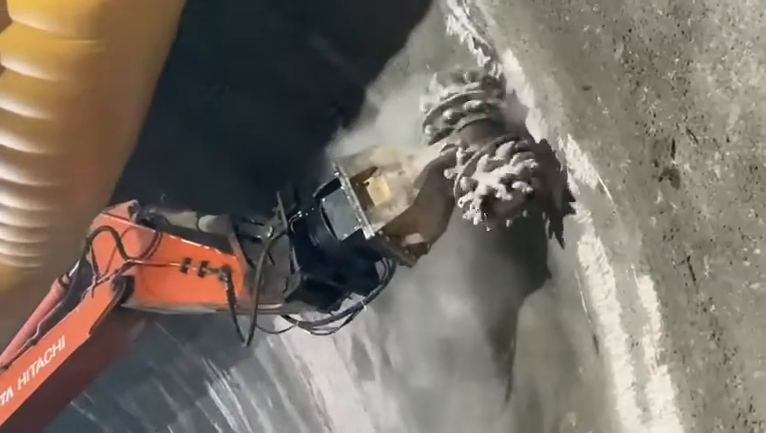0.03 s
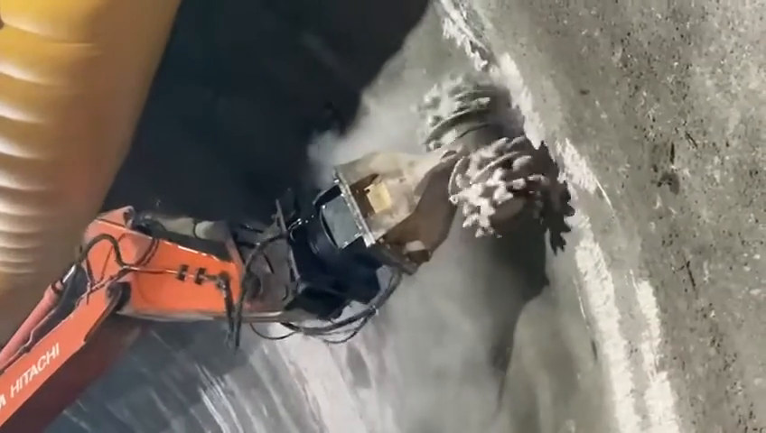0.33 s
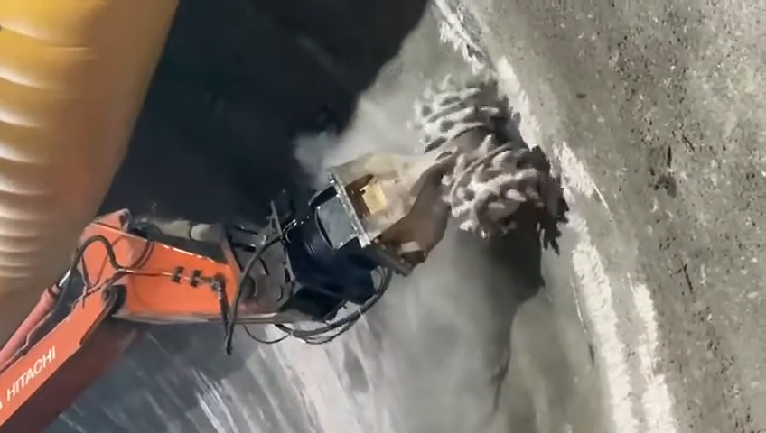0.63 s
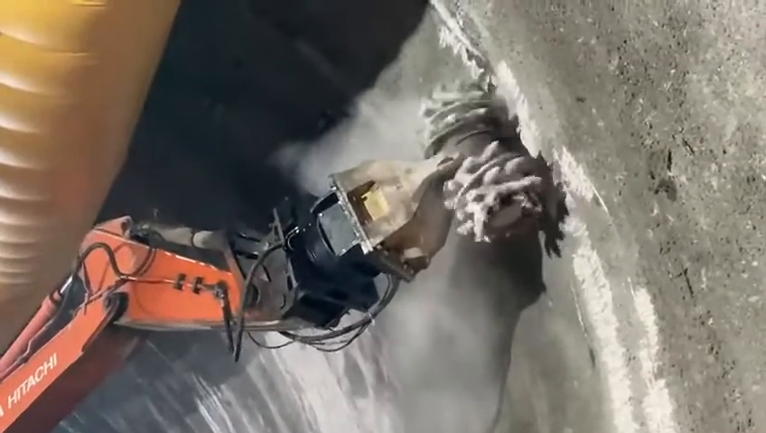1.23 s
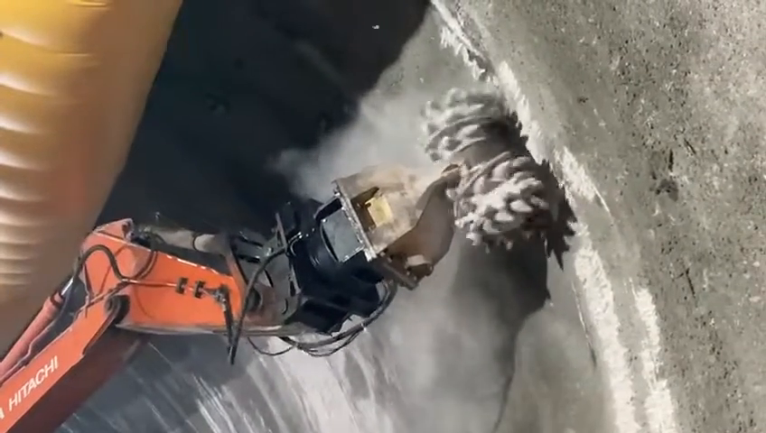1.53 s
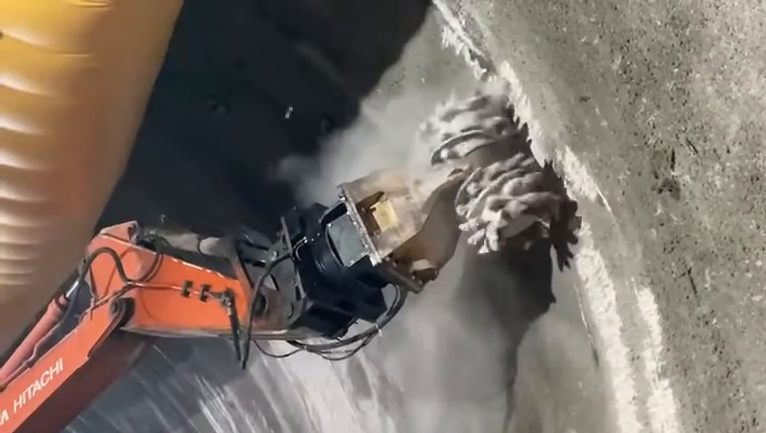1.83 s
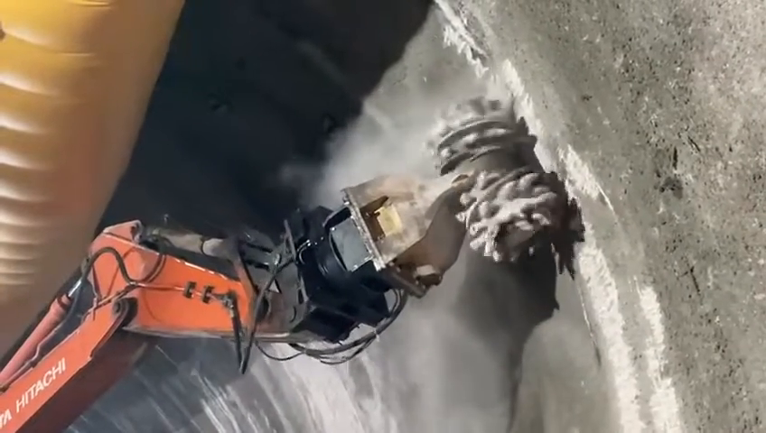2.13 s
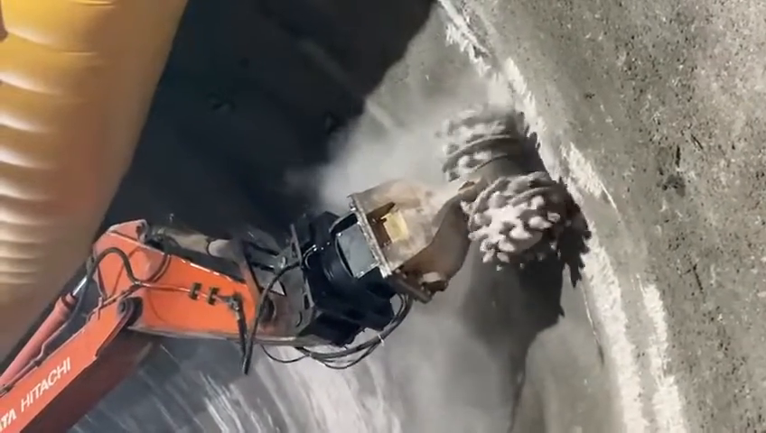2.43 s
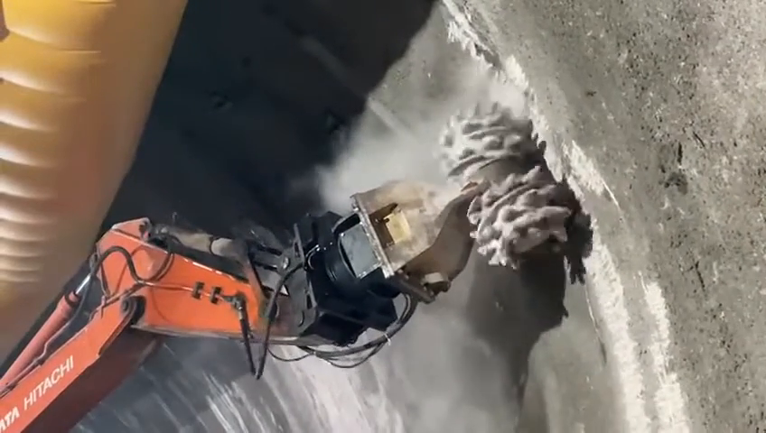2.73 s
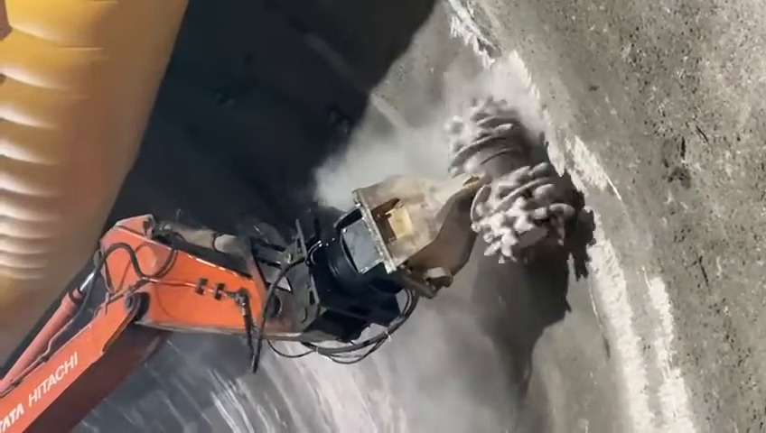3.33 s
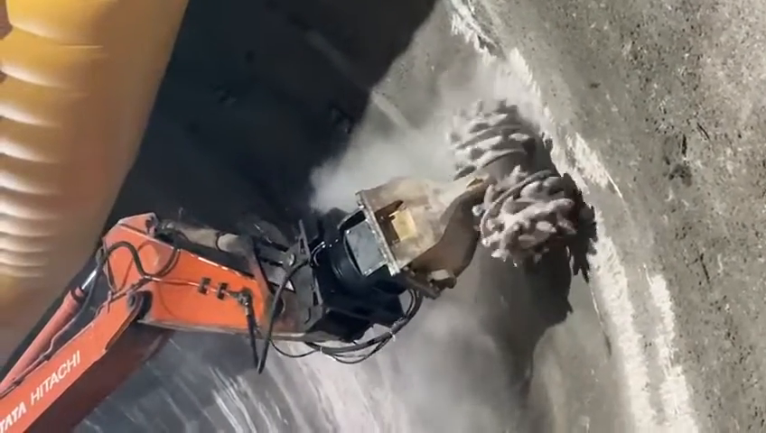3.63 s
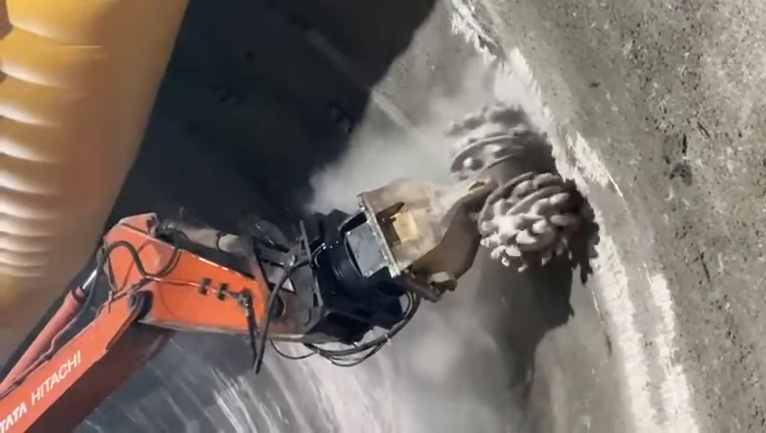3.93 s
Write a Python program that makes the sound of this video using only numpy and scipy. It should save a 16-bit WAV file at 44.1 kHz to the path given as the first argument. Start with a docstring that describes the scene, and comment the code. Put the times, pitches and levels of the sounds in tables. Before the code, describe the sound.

A rotating cutter crunches and scrapes through concrete while an excavator drones in a tunnel.

```python
"""A deep machine drone comes first, with roar and hydraulic whine: an excavator in a concrete tunnel.
Then the drum cutter on its arm meets the wall and crunches on, its picks biting in uneven scrapes
that ring the steel and spray chips. Gravel cracks, hard stones snap and sticking picks squeal.
A spaced pair of microphones stands in the tunnel, where the cutting arrives both direct and
blurred by the walls."""
import sys
import numpy as np
from scipy import signal
from scipy.fft import rfft, irfft
from scipy.io import wavfile

SR = 44100
rng = np.random.default_rng(int(sys.argv[2]) if len(sys.argv) > 2 else 0)


def log_audio(samples):
    """Write samples as a 16-bit WAV file to the path given in sys.argv[1]."""
    # one column per channel
    frames = np.atleast_2d(samples).T
    # limit to full scale, then quantise
    limited = np.clip(frames, -1, 1)
    pcm = np.round(limited * 32767).astype(np.int16)
    wavfile.write(sys.argv[1], SR, pcm)


N = 176400

# reverberation of the tunnel: frequency_hz, t60_s
TUNNEL_DECAY = [(100, 1), (1000, 0.37), (4000, 0.29), (11000, 0.52)]
TUNNEL_WET_DB, REFLECTIONS_PER_S = -1, 3000
# likeness of the two microphones: frequency_hz, correlation (-1 to 1)
MIC_LIKENESS = [(30, .94), (130, .96), (350, .73), (700, .62), (1200, .3), (1500, .02), (3400, .1),
                (4200, .45), (5100, -.2), (6100, 0), (6600, .85), (7250, 1), (7700, .6), (8500, -.9),
                (9100, -1), (9650, -.95), (10700, .95), (11500, 1)]
# balance of the pair: frequency_hz, left_minus_right_db
MIC_BALANCE = [(60, -1.2), (200, -0.16), (600, 1.7), (1500, 1.6), (2800, 0.28), (5700, -0.81), (8000, -1.8),
               (12000, -2.1)]
KNEE, CEILING, BAND_EDGE_HZ = .6, .88, 11900

# engine and fan roar: frequency_hz, relative_db
ROAR_SPECTRUM = [(20, -31), (40, -11), (58, -3.5), (110, -1), (170, 2), (260, -7), (400, -5), (850, -7),
                 (1300, -9), (2000, -17), (3000, -18.5), (4200, -26), (6800, -36), (11500, -43.5)]
ROAR_DB = -26
# hydraulic hum and whine: pitch_hz, width_hz, level_db
WHINE_TONES = [(64, 8, -41), (494, 14, -40), (880, 45, -41), (1442, 14, -41)]
# swell of the low hydraulic moan: time_s, level_db
MOAN_LEVEL = [(0, -30), (.5, -30.5), (1.1, -29.5), (1.45, -31.5), (1.75, -30), (2.05, -28.5), (2.3, -34),
              (2.9, -28), (3.3, -34), (4, -31.5)]
MOAN_HZ, MOAN_WIDTH_HZ = 264, 12
# note of the machine: time_s, pitch_hz
DRONE_NOTE = [(0, 83.5), (.4, 79), (.5, 78), (.6, 80), (1.6, 81), (1.93, 82), (2.2, 79.5), (2.95, 80),
              (3.35, 79.5), (3.85, 79.5), (4, 83)]
# strength of that note: time_s, level_db
DRONE_SWELL = [(0, -20), (.2, -21.5), (.36, -18.5), (.54, -24.5), (.62, -17), (.7, -18), (.8, -21.5),
               (1.2, -20.5), (2, -21), (2.6, -21), (3.05, -19), (3.55, -22), (4, -22)]
# its harmonics: multiple, relative_db
DRONE_HARMONICS = [(1, -2), (2, -21), (3, -19.5)]
DRONE_WAVER, DRONE_LEFT_DB = 0.023, -1.5

# gravel cracking between picks and wall: time_s, level_db
GRAVEL_LEVEL = [(0, -60), (.22, -58), (.25, -24), (.33, -39), (.5, -27), (.65, -32), (.79, -36), (.85, -23),
                (1.05, -39), (1.13, -42), (1.2, -31), (1.28, -36), (1.42, -22.5), (1.58, -35.5),
                (1.75, -25), (1.81, -58), (1.9, -30), (2.01, -33.5), (2.12, -26), (2.18, -22.5),
                (2.27, -29), (2.4, -25), (2.48, -30), (2.65, -35), (2.78, -29.5), (2.9, -28), (3.02, -51),
                (3.2, -28), (3.28, -45), (3.4, -36), (3.53, -45), (3.63, -30.5), (3.8, -42), (3.87, -24),
                (4, -39)]
GRAVEL_PER_S, GRAVEL_SPREAD_DB = 900, 2
GRAVEL_LOW_HZ, GRAVEL_HIGH_HZ, GRAVEL_RING_S = 1045, 3307, 0.0024
# stones snapping: start_s, level_db, decay_s
STONE_SNAPS = [(.377, -19, .001), (.693, -38, 0.0018), (.816, -28, .012), (0.8305, -15, 0.00094),
               (1.178, -27, .005), (1.29, -30, 0.0018), (1.728, -27, 0.017), (2.541, -27, .002),
               (2.706, -20.5, 0.0058), (3.056, -22, .005), (3.091, -19, .004), (3.099, -18, .003),
               (3.171, -17, 0.008)]
# colour of a snap: frequency_hz, relative_db
SNAP_SPECTRUM = [(30, -35), (200, -11), (1000, 0), (3000, 3.5), (5000, -1.5), (6300, -18), (6750, 8.5),
                 (7200, -6), (11500, -5.5)]
# modes of the drum and picks: pitch_hz, width_hz, relative_db
STEEL_MODES = [(918, 20, -19), (1436, 14, -18), (1770, 40, -12), (2025, 35, -18), (1893, 14, -14),
               (2245, 16, -21), (2350, 40, -17), (2555, 45, -20), (3100, 25, -18), (3453, 20, -16),
               (3709, 22, -22), (3942, 10, -20), (4076, 45, -25), (4530, 45, -19), (5700, 100, -10.5)]
CLINKS_PER_MODE_PER_S, CLINK_ROLLOFF_HZ = 10, 4400
CLINK_DB, CLINK_LOAD_SHARE = -26.5, 0.57
# sticking picks: middle_s, half_length_s, pitch_hz, level_db
PICK_SQUEALS = [(0.353, 0.022, 5710, -29), (.36, 0.028, 3960, -30), (0.728, 0.015, 1450, -29),
                (0.776, .01, 1450, -40), (0.85, 0.0064, 5700, -25), (0.894, 0.049, 3420, -30),
                (0.957, 0.014, 1892, -16), (0.965, 0.013, 2245, -30), (0.943, 0.024, 5690, -31.5),
                (1.032, 0.016, 3440, -30), (1.03, 0.012, 1893, -29), (1.091, .012, 1893, -32),
                (0.494, 0.061, 520, -23.5), (1.902, 0.019, 2280, -27.5), (2.08, 0.025, 913, -29),
                (2.56, .013, 893, -25), (2.685, 0.015, 890, -29), (3.095, .016, 1783, -32),
                (3.188, 0.011, 897, -23.5), (3.3, 0.014, 922, -28.5), (3.357, 0.0092, 917, -23),
                (3.404, 0.013, 907, -26), (3.448, .01, 1430, -27), (3.654, .01, 5700, -44),
                (3.815, 0.01, 5713, -40)]
SQUEAL_WOBBLE_HZ, SQUEAL_ROUGH_DB = 25.7, -0.5

# how hard the drum leans on the wall: time_s, level_db
DRUM_LOAD = [(0, -71), (.22, -42), (.32, -16.5), (.48, -17.5), (.6, -20.5), (.69, -22), (.78, -22.5),
             (.88, -21.5), (1.27, -31), (1.48, -20), (1.6, -27), (1.75, -22), (1.98, -26), (2.17, -22.5),
             (2.5, -26), (2.85, -24.5), (3.02, -30), (3.18, -29), (3.38, -30), (3.54, -33), (3.66, -27),
             (4, -28)]
# lumps of concrete breaking out: start_s, level_db
LUMP_BREAKS = [(.33, -24), (.44, -24), (.49, -34), (.68, -19), (1.4, -19), (1.725, -25), (2.06, -31),
               (2.16, -15.5), (2.38, -22.5)]
LUMP_RISE_S = 0.01
# crushed concrete: frequency_hz, relative_db
CRUNCH_SPECTRUM = [(25, -10), (60, -22), (115, 6), (250, 2.5), (320, 3), (400, -1), (520, 0.5), (680, -1.5),
                   (860, 1), (1050, -3.5), (1250, -4.5), (2000, -8.5), (3000, -13), (4200, -16.5),
                   (5100, -21), (7000, -24), (11500, -41)]
CRUNCH_PER_S, CRUNCH_SPREAD_DB = 3000, 3.5
PATCH_HZ, PATCH_S, PATCH_DB = 190, 0.027, 3.5  # width, length and depth of the fragments' colouring

# picks biting the wall: start_s, length_s, scrape_db, spray_db
PICK_BITES = [(0.228, 0.053, -25, -37), (0.296, 0.058, -21.5, -30), (0.403, 0.11, -27, -31),
              (0.7, 0.07, -50, -46), (0.81, 0.031, -19, -30.5), (0.866, 0.077, -31.5, -44),
              (0.922, 0.022, -22.5, -37), (1.01, 0.087, -28.5, -42), (1.154, 0.05, -25, -34.5),
              (1.254, 0.087, -31, -51), (1.392, 0.079, -30.5, -41.5), (1.612, 0.048, -27.5, -43),
              (1.723, 0.022, -24.5, -27.5), (1.818, 0.098, -28.5, -40.5), (1.932, 0.086, -28.5, -41),
              (2.034, 0.073, -25.5, -33.5), (2.13, 0.071, -26.5, -38), (2.254, 0.07, -27.5, -52),
              (2.36, 0.05, -26.5, -42), (2.513, 0.06, -28, -32), (2.69, 0.044, -28.5, -35.5),
              (2.736, 0.069, -27, -38), (2.84, 0.11, -33.5, -45), (3.045, 0.069, -30, -33),
              (3.167, 0.027, -27, -31), (3.25, 0.1, -32, -41), (3.334, 0.073, -31.5, -44),
              (3.619, 0.065, -33.5, -45), (3.697, 0.03, -28.5, -35.5), (3.77, 0.087, -32.5, -51),
              (3.841, 0.11, -30.5, -41.5), (3.963, 0.033, -28.5, -35.5)]
CHATTER_HZ, CHATTER_DB = 70, 1
RING_DRIFT_HZ, RING_DRIFT_DB = 2.6, 4  # each steel mode drifts in level
# steel dragging through stone: frequency_hz, relative_db
SCRAPE_SPECTRUM = [(200, -10), (700, 4), (1400, -8.5), (2000, 0.5), (2700, 1), (3400, -4), (4200, -7),
                   (5150, -12), (5750, -8), (6200, -11), (7000, -8.5), (7900, -22), (11500, -46)]
SCRAPE_PER_S, SCRAPE_SPREAD_DB, SCRAPE_ATTACK_S, SCRAPE_RELEASE_S = 3500, 3, 0.013, 0.037
# flying chips: frequency_hz, relative_db
SPRAY_SPECTRUM = [(1000, -34), (5000, -39), (6800, 6), (7900, 11), (9200, 7), (11500, 7.5), (12500, -47)]
SPRAY_PER_S, SPRAY_SPREAD_DB, SPRAY_ATTACK_S, SPRAY_RELEASE_S = 900, 1, 0.0038, 0.0062

TIME_S = np.arange(N) / SR
BIN_HZ = np.fft.rfftfreq(N, 1 / SR)


def gain_of(db):
    """Decibels to gain."""
    return 10 ** (np.asarray(db) / 20)


def unit_rms(x):
    """Scales to an rms of 1."""
    return x / np.sqrt(np.mean(x ** 2) + 1e-20)


def at_hz(points, hz):
    """Reads a table on a log-frequency axis."""
    frequency, value = np.transpose(points)
    return np.interp(np.log(hz + 1), np.log(frequency + 1), value)


def curve(points):
    """Reads a control curve at every sample."""
    return np.interp(TIME_S, *np.transpose(points))


def coloured(x, spectrum):
    """Gives white sound a spectrum and keeps its power."""
    return irfft(rfft(x) * unit_rms(gain_of(at_hz(spectrum, BIN_HZ))), N)


def wander(rate_hz, step=32):
    """Smooth random drift of rms 1, mostly slower than rate_hz."""
    t = TIME_S[::step]
    rolloff = 1 + (np.fft.rfftfreq(len(t), step / SR) / rate_hz) ** 4
    drift = irfft(rfft(rng.standard_normal(len(t))) / rolloff, len(t))
    return np.interp(TIME_S, t, unit_rms(drift))


def resonate(x, hz, width_hz):
    """One ringing mode; keeps the power of white sound."""
    radius = np.exp(-np.pi * width_hz / SR)
    pole = radius * np.exp(2j * np.pi * hz / SR)
    return signal.lfilter([np.sqrt(2 * (1 - radius ** 2))], [1, -pole], x).real


def fractures(per_s, spread_db):
    """Tiny clicks at random moments, a few much larger than the rest."""
    size = gain_of(spread_db * np.minimum(rng.exponential(1, N), 4))
    breaks = rng.random(N) < per_s / SR
    return unit_rms(size * breaks * rng.choice([-1., 1.], (2, N)))


def stroke(start, length, attack_s, release_s):
    """Attack, hold and release of one pick's cut."""
    age = TIME_S - start
    return np.clip(age / attack_s, 0, 1) * np.exp(-np.maximum(age - length, 0) / release_s)


def tunnel(direct):
    """Dense reflections from the concrete walls join the direct sound; the bass lingers longest."""
    reflections = rng.standard_normal((2, SR)) * (rng.random((2, SR)) < REFLECTIONS_PER_S / SR)
    hz, t, bands = signal.stft(reflections, SR, nperseg=256)
    t60_s = at_hz(TUNNEL_DECAY, hz)[:, None]
    tail = signal.istft(bands * gain_of(-60 * t / t60_s) / np.sqrt(t60_s), SR, nperseg=256)[1]
    tail /= np.linalg.norm(tail, axis=1, keepdims=True)
    wet = signal.fftconvolve(direct, tail, axes=1)[:, :N]
    return (direct + gain_of(TUNNEL_WET_DB) * wet) / np.hypot(1, gain_of(TUNNEL_WET_DB))


def spaced_pair(x):
    """Two microphones, set apart, hear the bass alike and the treble in or out of step."""
    first, second = rfft(x)
    likeness = np.clip(at_hz(MIC_LIKENESS, BIN_HZ), -.995, .995)
    lean = gain_of(at_hz(MIC_BALANCE, BIN_HZ) / 2)
    mid = first * np.sqrt((1 + likeness) / 2)
    side = second * np.sqrt((1 - likeness) / 2)
    return irfft(np.array([(mid + side) * lean, (mid - side) / lean]), N)


def engine_and_hydraulics():
    """Behind the cutting, engine and fan roar under fuzzy hydraulic tones; a low moan swells and ebbs."""
    roar = gain_of(ROAR_DB) * coloured(rng.standard_normal((2, N)), ROAR_SPECTRUM)
    flow = rng.standard_normal((2, N))
    moan = gain_of(curve(MOAN_LEVEL)) * unit_rms(resonate(flow, MOAN_HZ, MOAN_WIDTH_HZ))
    whine = sum(gain_of(db) * unit_rms(resonate(flow, hz, width)) for hz, width, db in WHINE_TONES)
    return roar + moan + whine


def drone():
    """The deep, nearly pure note of the machine, just right of centre, sagging as the drum bites."""
    cycles = np.cumsum(curve(DRONE_NOTE)) / SR
    tone = sum(gain_of(db) * np.sin(2 * np.pi * multiple * cycles) for multiple, db in DRONE_HARMONICS)
    level = gain_of(curve(DRONE_SWELL)) * (1 + DRONE_WAVER * wander(rate_hz=19))
    return unit_rms(tone) * level * gain_of([[DRONE_LEFT_DB / 2], [-DRONE_LEFT_DB / 2]])


def gravel(ping_samples=1000):
    """Countless pebbles crack, each ringing for an instant at its own pitch."""
    when, pitch, chance, angle = rng.random((int(GRAVEL_PER_S * N / SR), 4)).T
    t = TIME_S[:ping_samples]
    hz = GRAVEL_LOW_HZ + (GRAVEL_HIGH_HZ - GRAVEL_LOW_HZ) * pitch ** 1.3
    strength = gain_of(-GRAVEL_SPREAD_DB * np.log(chance + np.exp(-4)))
    pings = strength[:, None] * np.sin(2 * np.pi * hz[:, None] * t) * np.exp(-t / GRAVEL_RING_S)
    samples = ((when * N).astype(int)[:, None] + np.arange(ping_samples)).ravel()
    pans = np.cos(2 * np.pi * angle), np.sin(2 * np.pi * angle)
    crackle = np.array([np.bincount(samples, (pings * pan[:, None]).ravel(), N)[:N] for pan in pans])
    return unit_rms(crackle) * gain_of(curve(GRAVEL_LEVEL))


def snaps():
    """Hard stones in the concrete break with a short crack."""
    level = sum(gain_of(db) * (TIME_S >= start) * np.exp(-abs(TIME_S - start) / decay)
                for start, db, decay in STONE_SNAPS)
    return coloured(level * rng.standard_normal((2, N)), SNAP_SPECTRUM)


def clinks():
    """Picks knock on stones, louder with the load; the blunt knocks favour the lower steel modes."""
    ring = np.zeros((2, N))
    for hz, width, db in STEEL_MODES:
        hits = rng.random(N) < CLINKS_PER_MODE_PER_S / SR
        knocks = hits * rng.uniform(.5, 1, (2, N)) * rng.choice([-1., 1.], (2, N))
        rolloff = 1 + (hz / CLINK_ROLLOFF_HZ) ** 4
        ring += gain_of(db) / rolloff * unit_rms(resonate(knocks, hz, width))
    load_db = curve(DRUM_LOAD)
    return ring * gain_of(CLINK_DB + CLINK_LOAD_SHARE * (load_db - load_db.mean()))


def squeals():
    """A sticking pick drives one steel mode into a brief, rough whistle or groan."""
    out = np.zeros((2, N))
    wobble = np.cumsum(SQUEAL_WOBBLE_HZ * wander(rate_hz=126)) / SR
    rough = unit_rms(gain_of(SQUEAL_ROUGH_DB * wander(rate_hz=88)))
    for middle, half, hz, db in PICK_SQUEALS:
        span = abs(TIME_S - middle) < 6 * half
        t = TIME_S[span]
        swell = gain_of(db) * rough[span] / np.sqrt(1 + ((t - middle) / half) ** 4)
        mic_offset = np.array([[0], [rng.uniform(-0.049, 0.31)]])
        cycles = hz * t + wobble[span] + mic_offset
        out[:, span] += swell * unit_rms(np.sin(2 * np.pi * cycles))
    return out


def fragment_colour(x):
    """Fragments of all sizes colour the sound in short, shifting patches."""
    hz, t, bands = signal.stft(x, SR, nperseg=512, noverlap=384)
    across, along = np.fft.fftfreq(len(hz), hz[1])[:, None], np.fft.fftfreq(len(t), t[1])
    blur = np.exp(-(across * PATCH_HZ) ** 2 - (along * PATCH_S) ** 2)
    patches = unit_rms(np.fft.ifft2(np.fft.fft2(rng.standard_normal(blur.shape)) * blur).real)
    bands *= unit_rms(gain_of(PATCH_DB * patches))
    return signal.istft(bands, SR, nperseg=512, noverlap=384)[1][:, :N]


def crunch():
    """Concrete crumbles under the drum, louder as it leans in and as lumps break out."""
    level = gain_of(curve(DRUM_LOAD))
    for start, db in LUMP_BREAKS:
        age = np.maximum(TIME_S - start, 0) / LUMP_RISE_S
        level = np.hypot(level, gain_of(db) * age * np.exp(1 - age))
    crumble = fractures(CRUNCH_PER_S, CRUNCH_SPREAD_DB)
    flicker = gain_of(wander(rate_hz=24))
    return coloured(crumble * level * flicker, CRUNCH_SPECTRUM)


def bites():
    """At the wall, each pick chatters through stone, rings a changing mix of modes and throws chips."""
    drag, chips = np.zeros(N), np.zeros(N)
    for start, length, scrape_db, spray_db in PICK_BITES:
        cut = gain_of(scrape_db) * stroke(start, length, SCRAPE_ATTACK_S, SCRAPE_RELEASE_S)
        burst = gain_of(spray_db) * stroke(start, length, SPRAY_ATTACK_S, SPRAY_RELEASE_S)
        drag, chips = np.hypot(drag, cut), np.hypot(chips, burst)  # overlapping bites add in power
    chatter = gain_of(CHATTER_DB * wander(rate_hz=CHATTER_HZ))
    force = unit_rms(fractures(SCRAPE_PER_S, SCRAPE_SPREAD_DB) * chatter) * drag
    ring = np.zeros((2, N))
    for hz, width, db in STEEL_MODES:
        drift = unit_rms(gain_of(RING_DRIFT_DB * wander(RING_DRIFT_HZ)))
        ring += gain_of(db) * drift * resonate(force, hz, width)
    spray = unit_rms(fractures(SPRAY_PER_S, SPRAY_SPREAD_DB) * chatter) * chips
    return coloured(force, SCRAPE_SPECTRUM) + ring + coloured(spray, SPRAY_SPECTRUM)


def scene():
    """From the microphones: the cutting echoes in the tunnel; machine, snaps and squeals stay dry."""
    cutting = fragment_colour(crunch() + bites() + gravel()) + clinks()
    return spaced_pair(engine_and_hydraulics() + tunnel(cutting) + snaps()) + drone() + squeals()


def record(dry):
    """The recorder rounds off the highest peaks, then limits the band."""
    over = np.maximum(abs(dry) - KNEE, 0)
    headroom = CEILING - KNEE
    rounded = dry - np.sign(dry) * (over - headroom * np.tanh(over / headroom))
    lowpass = signal.firwin(511, BAND_EDGE_HZ, window=("kaiser", 9), fs=SR)
    return signal.oaconvolve(rounded, lowpass[None], "same")


dry = scene()
out = record(dry)
log_audio(out)
```